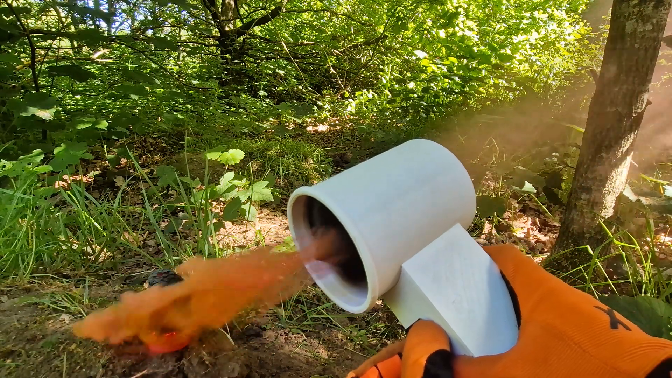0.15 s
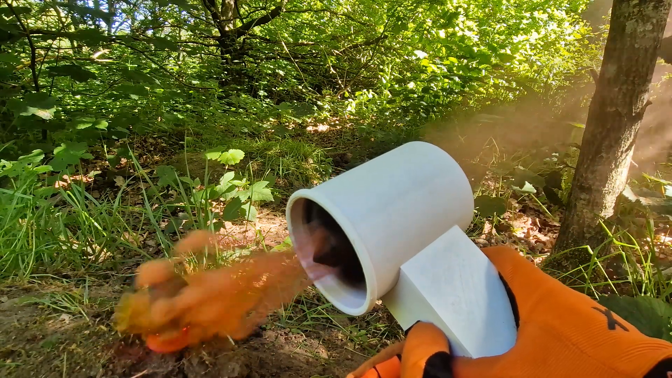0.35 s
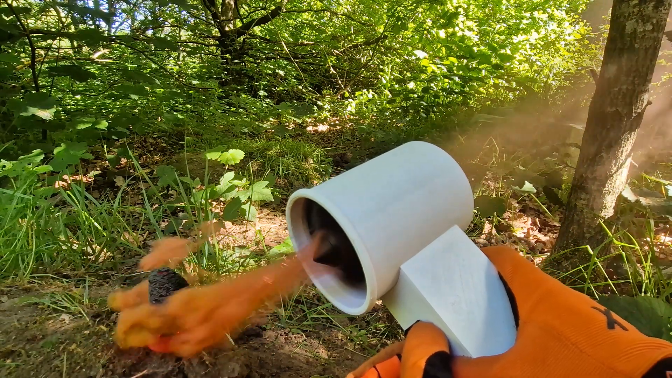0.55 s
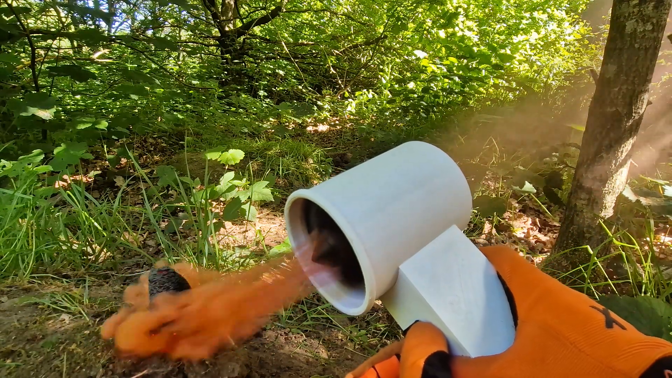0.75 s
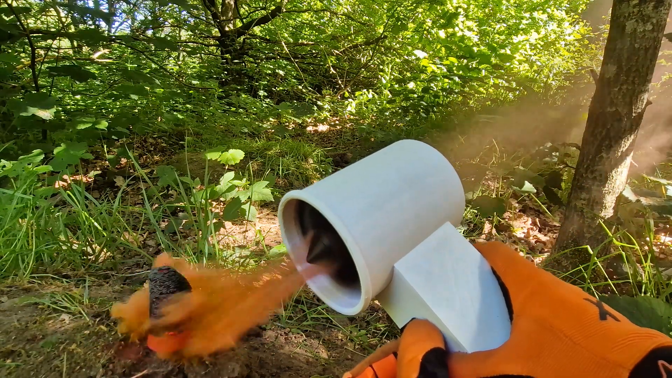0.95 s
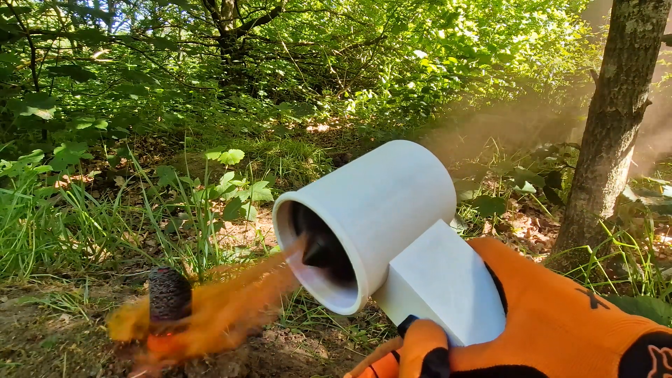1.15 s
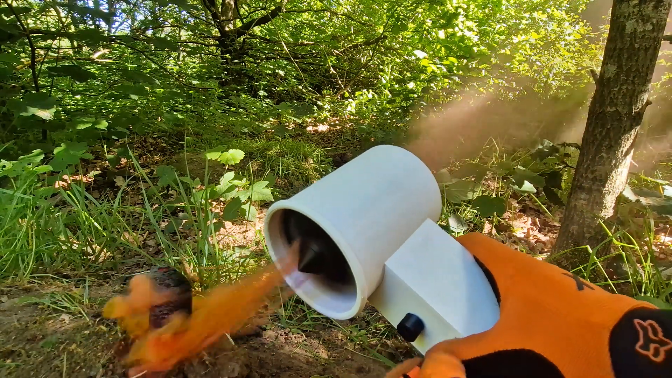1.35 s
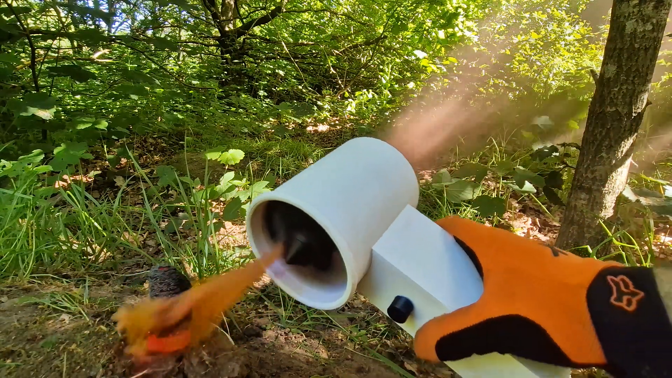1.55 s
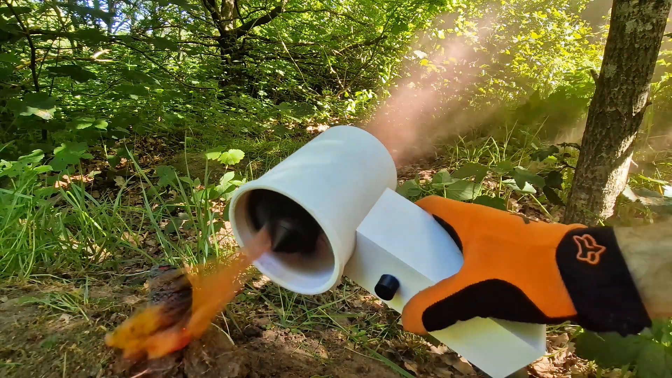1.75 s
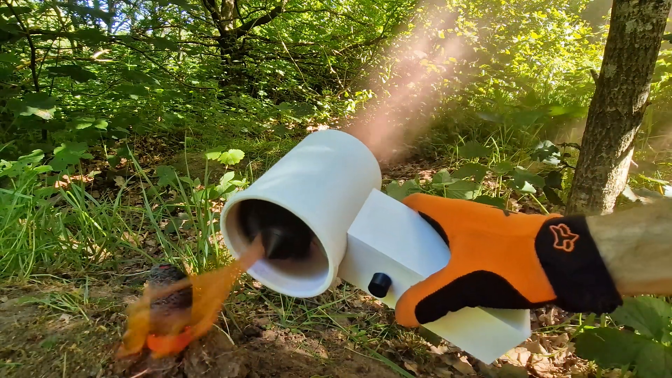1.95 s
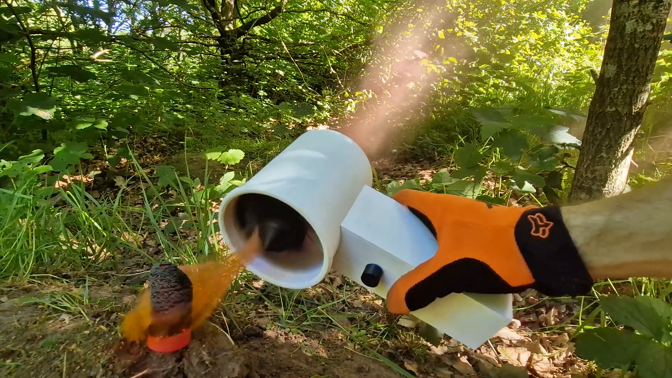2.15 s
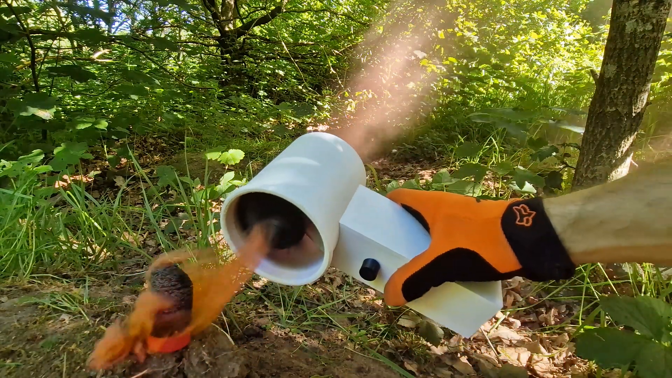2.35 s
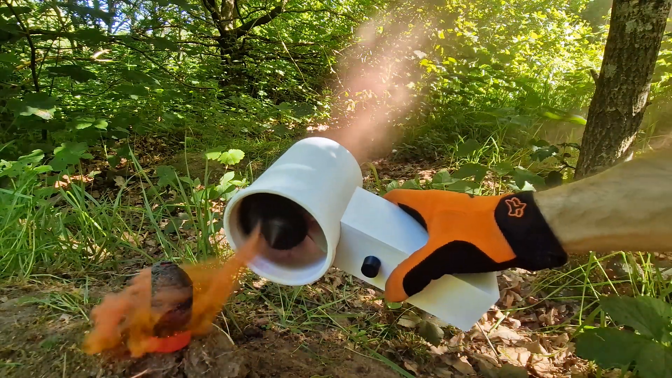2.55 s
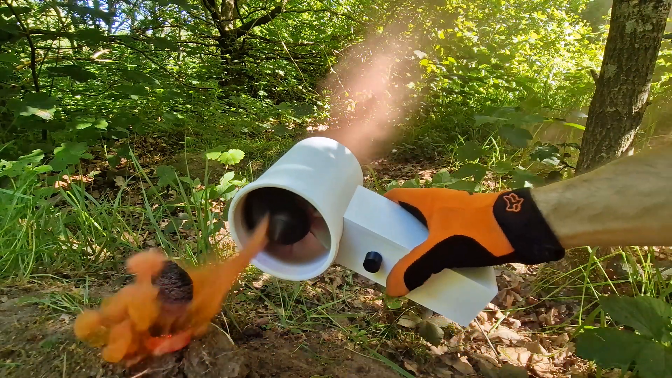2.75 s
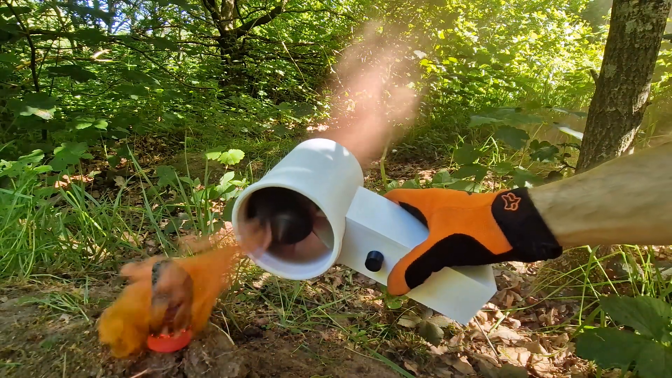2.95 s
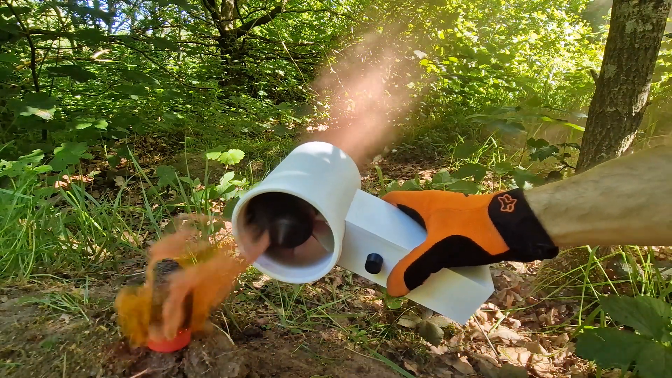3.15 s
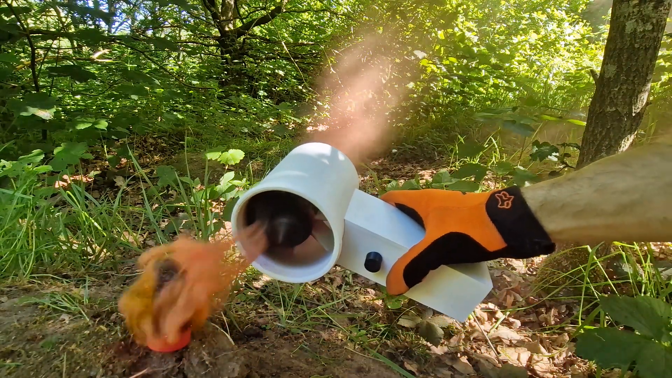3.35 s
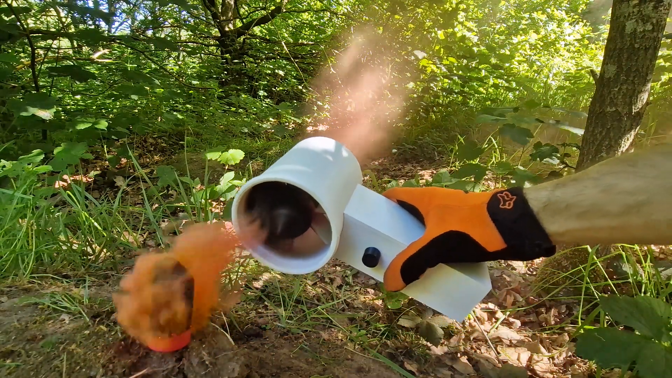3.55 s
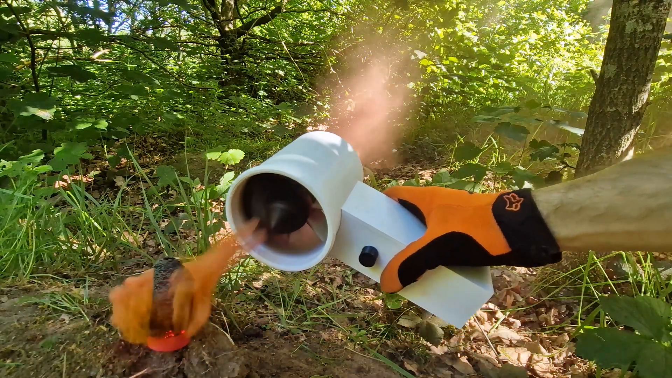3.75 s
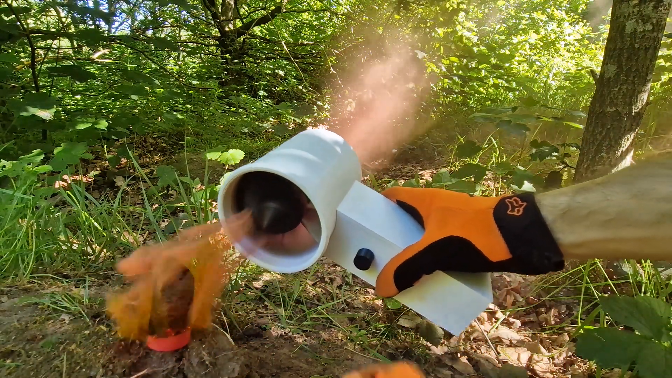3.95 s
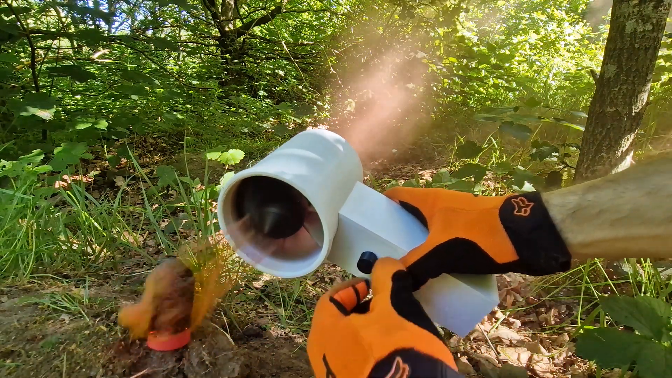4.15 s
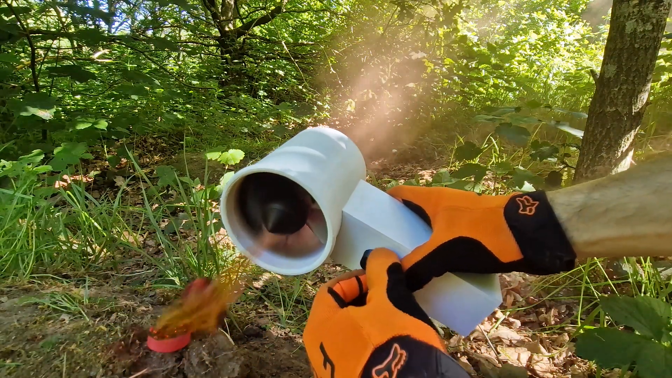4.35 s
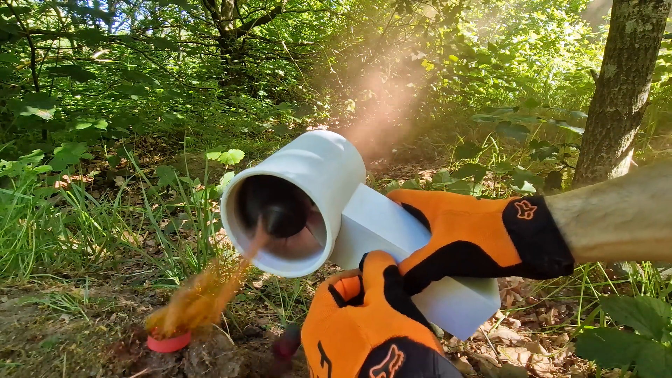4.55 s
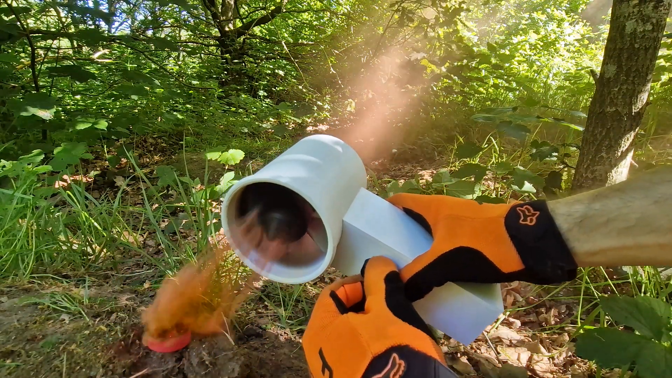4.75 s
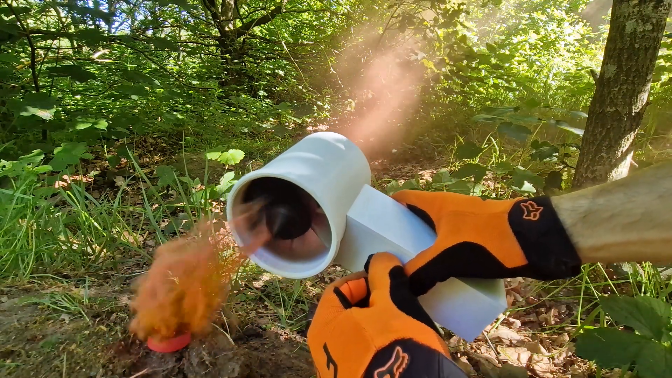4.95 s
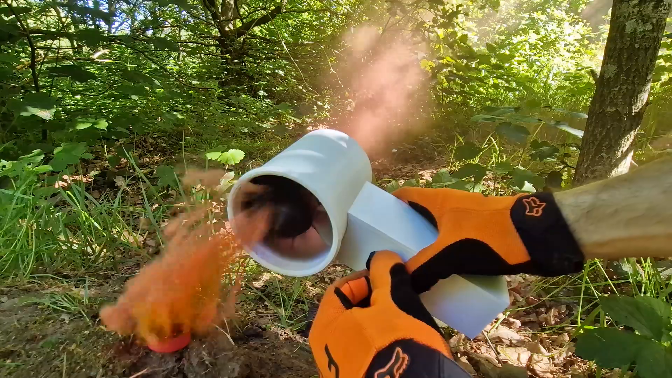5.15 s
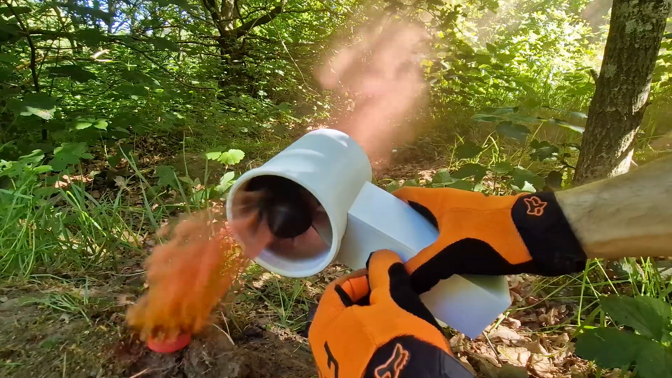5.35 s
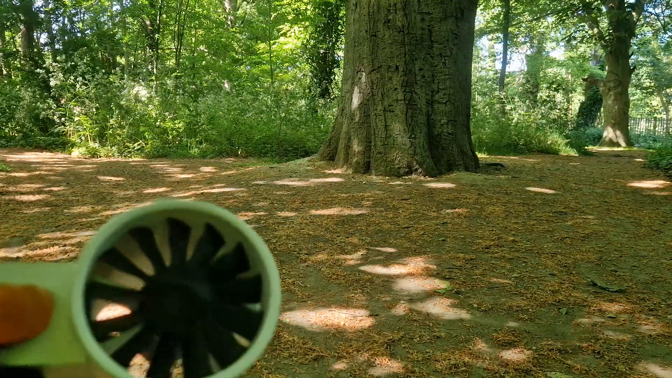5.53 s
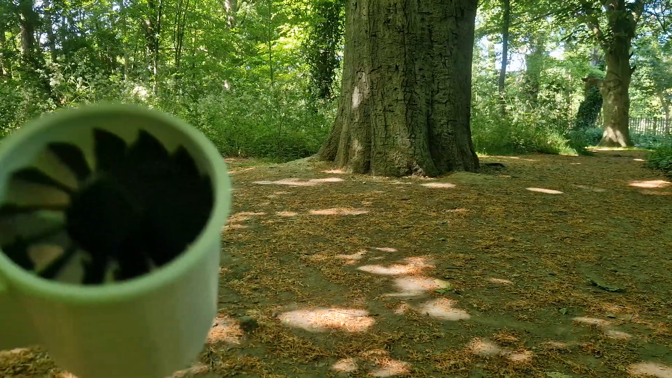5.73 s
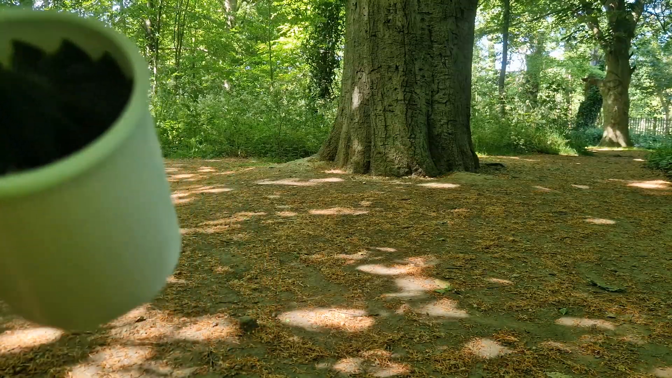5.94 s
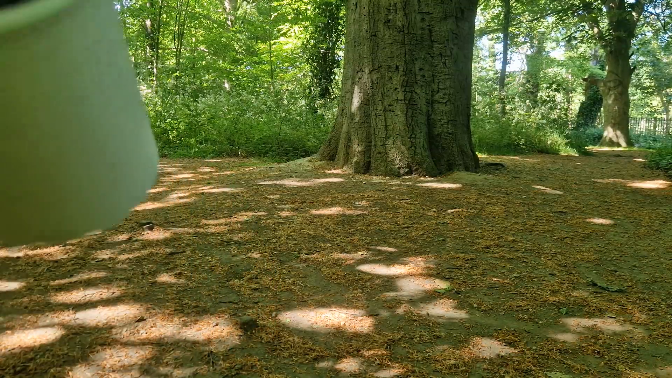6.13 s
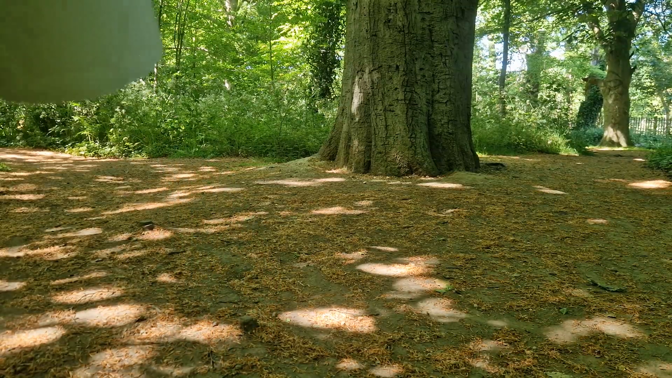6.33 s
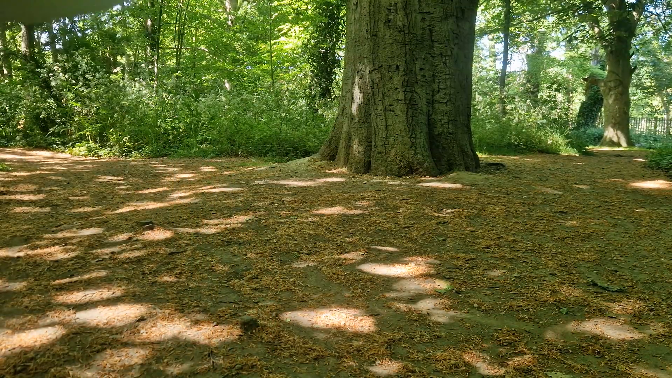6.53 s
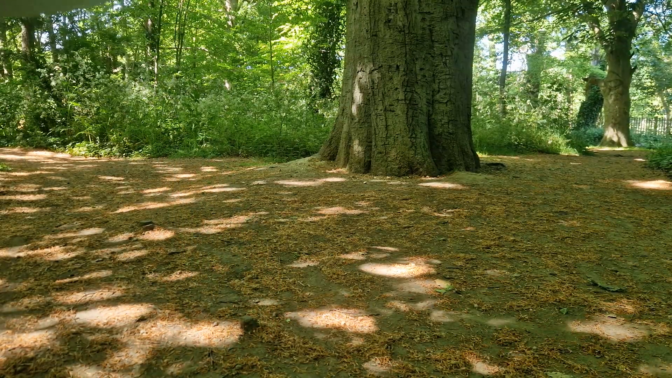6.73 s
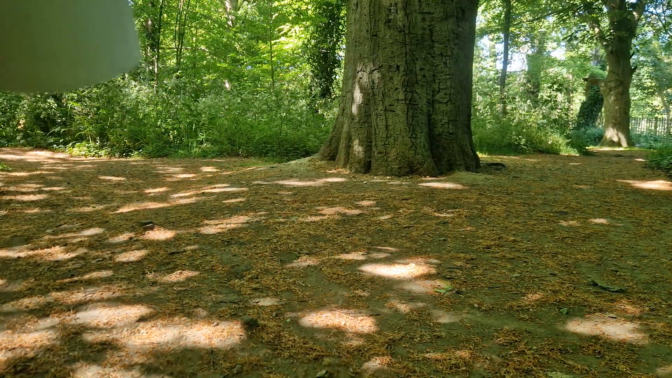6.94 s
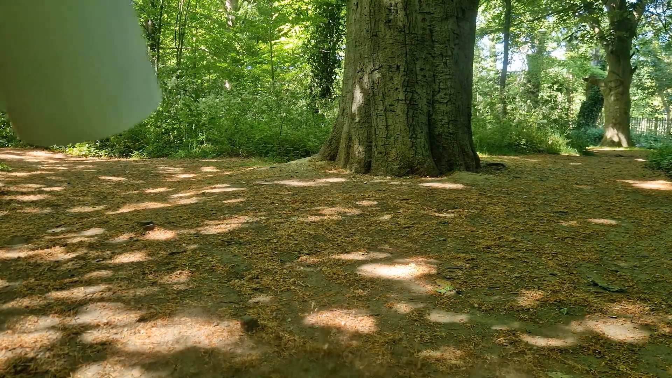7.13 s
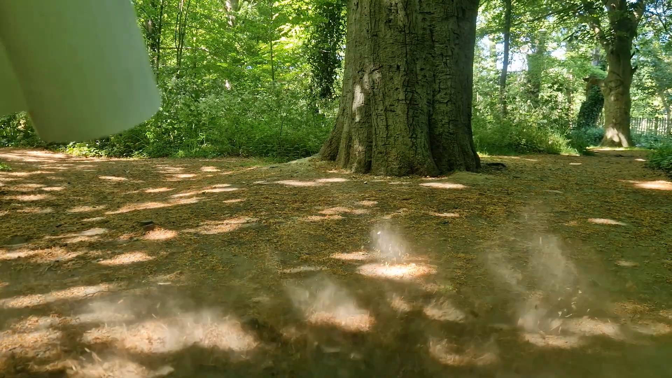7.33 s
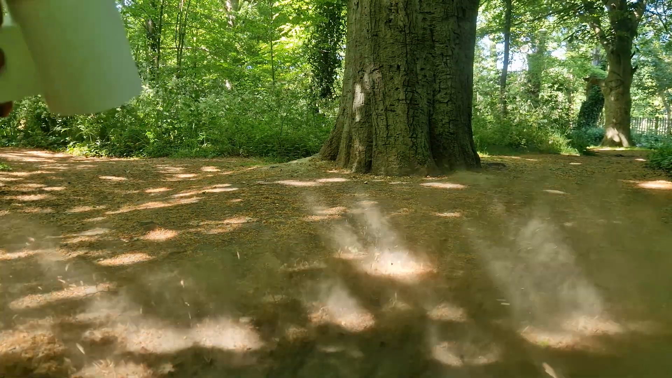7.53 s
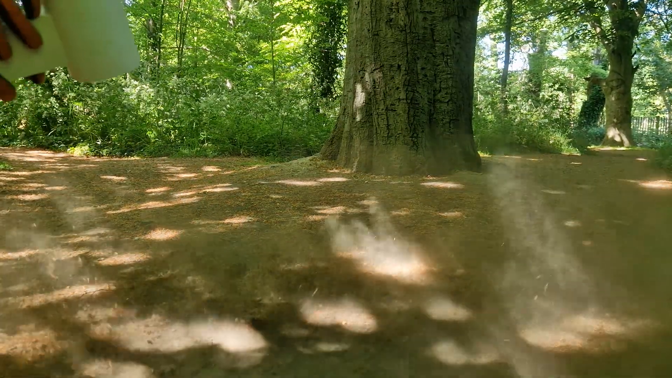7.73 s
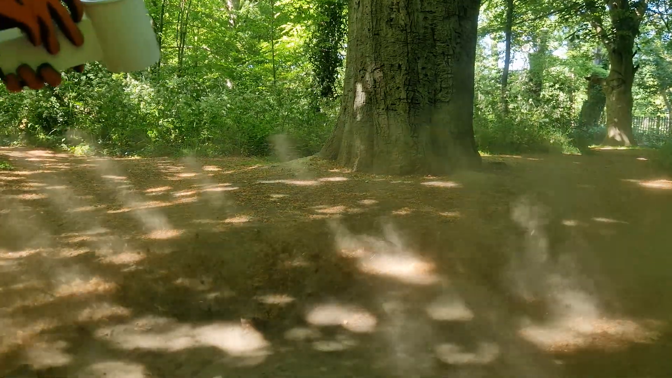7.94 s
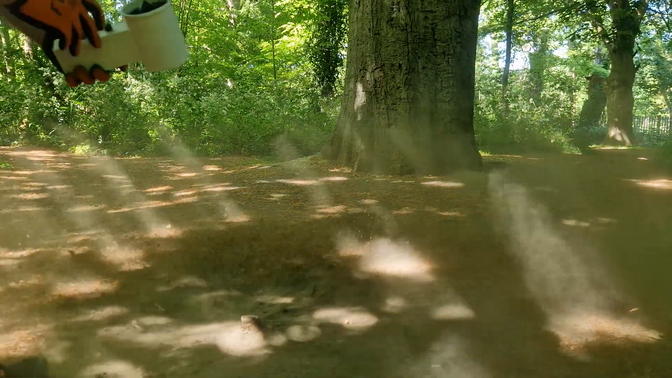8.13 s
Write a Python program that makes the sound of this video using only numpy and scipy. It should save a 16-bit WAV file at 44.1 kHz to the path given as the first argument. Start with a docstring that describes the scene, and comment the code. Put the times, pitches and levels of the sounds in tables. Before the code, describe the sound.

Outdoors in a wood, a small electric ducted fan runs close to a stereo microphone, stronger on the left, with a hollow howl, rushing air and thin blade whine. A soft thump comes as it is turned down. The scene cuts to faint leaves and a far engine drone; then the fan spins up from rest, surging to a loud buzzing, hissing blast.

```python
"""In a wood, a hand-held 13-bladed ducted fan runs close to a stereo microphone, in two scenes.
First it sucks in smoke at part throttle, its duct howling (resonant noise), and a knob turns it down.
Then it revs from rest to full speed: the rotor buzzes (shaft orders) and the jet hisses (shaped noise).
The speed controller whistles faintly (a carrier with sidebands); behind the fan, leaves rustle (soft
noise) and an engine drones far away (one gliding tone)."""
import sys
import numpy as np
from scipy.fft import rfft, irfft, next_fast_len
from scipy.io import wavfile
from scipy.ndimage import uniform_filter1d, map_coordinates

SR = 44100
rng = np.random.default_rng(int(sys.argv[2]) if len(sys.argv) > 2 else 0)


def digitize_waveform(pressure):
    """Quantize a signal to 16-bit integers and store it at the path in sys.argv[1].

    Rows of a 2-D input are taken as channels; values are limited to [-1, 1].
    """
    field = np.atleast_2d(pressure).T
    bounded = np.clip(field, -1, 1)
    quanta = np.round(bounded * 32767).astype(np.int16)
    wavfile.write(sys.argv[1], SR, quanta)


N = 365588

# Rotor speed in each scene. Each row: time in seconds, shaft speed in turns a second.
SMOKE_SPEED = [(0, 121.5), (.25, 122.3), (.4, 130), (.85, 138.4), (1.1, 137), (1.25, 140.4), (2, 142),
               (2.9, 140.1), (3.3, 140.6), (4.2, 142.7), (4.43, 141.2), (4.6, 123), (4.85, 100), (5.47, 96)]
REV_SPEED = [(6.09, 10), (6.15, 34), (6.23, 56), (6.35, 77), (6.5, 98), (6.6, 105.5), (6.75, 111.5),
             (6.85, 121), (6.88, 132), (6.95, 168), (7.03, 240), (7.1, 304), (7.18, 325), (7.28, 333.5),
             (7.6, 328), (7.95, 323), (8.29, 317)]
# The hand swings the intake towards the microphone. Each row: time in seconds, share of the swing (0-1).
SWING = [(1.15, 0), (1.6, .55), (2.9, 1)]
# Air at part throttle; rows are draught, howl, upper duct modes, hiss.
# Each row: base level at cruise in dB, dB per doubling of speed, change with the full swing in dB.
SMOKE_LAWS = [(-40.5, 9, 0), (-24, 25, -4.5), (-36.5, 15.5, -0.2), (-35.5, 19.5, 2)]
# Air while revving, rows in the same order. Each row: base level at the knee in dB, dB per doubling
# below it, dB per doubling above it, surge under hard acceleration in dB, change once lifted in dB.
REV_LAWS = [(-38, 12, 1.5, 7, -4), (-33.5, 27, 1, 6, -3), (-37, 18, 6, 8, -5), (-41.5, 18, 9, 6.5, -4)]
# Duct resonances: the howl locked on, the loose howl of a slow flow, the upper modes.
# Each row: centre in Hz, width in Hz, relative level in dB.
SMOKE_HOWL = [(1043, 95, 0.5), (1114, 295, -8), (935, 140, -17)]
SMOKE_LOOSE = [(743, 120, -9.5), (872, 170, 0), (1095, 350, 7), (1214, 110, 6)]
SMOKE_DUCT = [(1530, 290, -12), (1980, 240, 4.5), (2300, 770, -1.5), (2860, 370, -6.5)]
REV_HOWL = [(1060, 240, 2.5), (1136, 250, -2), (1480, 140, -3)]
REV_DUCT = [(2025, 92, 6.5), (2037, 1360, -1.5), (3000, 190, -4.5)]
# Duct modes heard from the side, before the swing. Each row: centre in Hz, width in Hz, relative dB.
SIDE_MODES = [(390, 90, -9), (870, 200, 0), (3050, 380, -13)]
# Duct modes that the blade tone sweeps through. Each row: centre in Hz, width in Hz, gain in dB.
BLADE_FLARES = [(2060, 180, -28), (4220, 150, -42)]
# Strong and higher shaft orders. Each row: order (cycles per turn), base level at full speed in dB.
BUZZ = [(1, -29.5), (2, -33.5), (3, -33), (4, -35.5)]
OVERTONES = [(5, -40), (6, -54), (7, -42.5), (8, -41), (9, -49), (11, -70), (12, -66)]
# Noise colours of draught, hiss, its fizzing top, and the wood. Each row: frequency in Hz, relative dB.
SMOKE_DRAUGHT = [(20, -24), (45, -4), (80, 4), (130, 2.5), (250, -0.5), (390, 2), (620, 0.5), (730, 3),
                 (1000, -14.5), (1600, -2), (3000, -48)]
REV_DRAUGHT = [(30, -25), (120, -10), (220, -10), (380, -0.5), (520, -1), (700, 3), (880, 1.5), (1500, 2.5),
               (3000, -48)]
SMOKE_HISS = [(900, -31), (2000, -5.5), (2800, -2.5), (3600, 2), (4500, 0.5), (5300, 1), (6400, 1),
              (7100, 1), (7700, 1), (8500, -8), (10000, -23)]
REV_HISS = [(900, -14.5), (2500, -4), (3700, -1.5), (4200, 1.5), (4550, -0.5), (5300, 4), (6400, 4.5),
            (7000, 3.5), (7600, 4), (8500, -6.5), (10000, -50)]
FIZZ = [(6000, -19), (8900, 0.5), (10400, 3), (12500, 0.5), (13700, 0), (15000, 0), (16000, -1.5)]
WOOD = [(15, -47), (25, -17), (38, -6.5), (59, -7.5), (71, -17), (86, -15.5), (116, -22), (209, -35),
        (722, -39), (1800, -47.5), (7500, -50), (9050, -63), (15500, -62)]
# Likeness of noise at the two ports. Each row: frequency in Hz, left-right correlation (0-1).
ALIKE = [(100, .985), (1100, .97), (2200, .72), (4500, .53), (8000, .36), (14000, .24)]
# Port balance for the fan. Each row: frequency in Hz, left over right in dB.
SMOKE_SIDE = [(60, 3.1), (110, 1.8), (200, 5.3), (380, 4.3), (700, 4.6), (1290, 2.1), (2380, 7.9),
              (4400, 4.6), (8120, 6.4), (15000, 9.5)]
REV_SIDE = [(60, 2.0), (110, 3.4), (200, 7.4), (380, 5.3), (700, 5.4), (1290, 5.1), (2380, 5.8),
            (4400, 6.4), (8120, 3.7), (15000, 7.6)]
# Far engine. Each row: time in seconds, pitch in Hz, base level in dB.
DRONE = [(5.2, 67.1, -55), (5.39, 62, -53), (5.51, 54.7, -54), (5.72, 51, -50), (5.91, 53.5, -45),
         (6.13, 66.1, -51), (6.22, 66.3, -61), (6.7, 52.8, -50), (7.02, 49.7, -50), (7.25, 48.3, -57),
         (7.44, 49.4, -65), (8.29, 47.8, -52)]

T = np.arange(N) / SR  # (s)
SIZE = next_fast_len(N + 8192)  # padded length for filtering
HZ = np.fft.rfftfreq(SIZE, 1 / SR)
LEFT_RIGHT = np.array([[1], [-1]])  # a dB tilt: added at the left port, taken from the right

CUT = 5.462  # the second scene begins (s)
TOP_HZ = 15800  # the microphone's band limit
BLADES = 13
CRUISE, FULL = 140, 325  # part and full throttle (turns a second)
KNEE = 111.2  # the flow through the duct is established (turns a second)
HARD_ACCELERATION = 900  # (turns a second, per second)
SURGE_LAG_S = 0.02  # the eddies take a moment to build up
LOCK_SPEED = 164  # revving, the howl locks around this speed (turns a second)
LOCK_DOUBLINGS, LOCK_DB = 0.33, 7.5  # range of that lock in doublings, and its lift
BLADE_LEAN_DB = 2.5  # the blade tone beams at the left port
LIFT_AT, LIFT_S = 7.3, 0.49  # the hand raises the fan away from the microphone (s)
GROUND_MS = 2.983  # lag of the ground's echo before the fan rises
GROUND_MS_PER_S, RISE_AT = 1.29, 7.0  # growth of that lag, from this time (s)
SWITCH_HZ = 8040  # whistle of the speed controller


def part_throttle():
    """Air blows the duct's lowest resonance like a pipe; a thin blade tone rides above it."""
    speed, = curves(SMOKE_SPEED)
    swing, = curves(SWING)
    shaded = ramp(3.85, .35)  # the other hand reaches for the knob and shades the intake
    doublings = np.log2(speed / CRUISE)
    draught_db, howl_db, duct_db, hiss_db = (
        db + slope * doublings + swung * swing for db, slope, swung in SMOKE_LAWS)
    angle = shaft_angle(speed, jitter=.002)

    # only a fast flow locks onto one resonance; a slow one stirs several loosely
    locked = np.clip((speed - 110) / 32, .02, .98)
    howl = np.sqrt(locked) * turbulence(resonances(SMOKE_HOWL), flutter_db=.5)
    howl += np.sqrt(1 - locked) * turbulence(resonances(SMOKE_LOOSE), flutter_db=.2)
    air = amp(howl_db) * howl
    air += amp(draught_db) * turbulence(amp(along(SMOKE_DRAUGHT)), flutter_db=0.9)
    duct_db = duct_db - 0.99 * shaded + beam_gap(at=1.77, width_s=0.99, depth_db=-4.5)
    air += amp(duct_db) * turbulence(resonances(SMOKE_DUCT), flutter_db=0.35)
    air += amp(hiss_db) * jet(SMOKE_HISS, speed, fizz_db=-8, brighten_db=3, mode_hz=1045, echo=0.055)
    side_db = -34.5 - 10 * doublings - 24 * swing
    air += amp(side_db) * turbulence(resonances(SIDE_MODES), flutter_db=1)

    blade_db = -46 + 32 * doublings - 5 * shaded + beam_gap(at=1.6, width_s=.45, depth_db=-8)
    blades = amp(blade_db) * blade_tone(angle)
    unbalance = amp(-51.5 + 9 * doublings) * tone(angle, waver_db=1.8)
    whistle = controller(angle, speed, db=-62, sideband_db=-8)
    fan = air + blades + unbalance + whistle + cogging(angle, speed, db=-52)
    drift_db = 0.03 * (T - 2.7) * LEFT_RIGHT  # the hand carries the fan slowly to the left
    return amp(drift_db) * ports(fan, lead_ms=0.15, side=SMOKE_SIDE)


def rev_up():
    """The air surges as the rotor accelerates from rest; at full speed its unbalance shakes the shell."""
    speed, = curves(REV_SPEED)
    doublings = np.log2(speed / KNEE)
    surge = strain(speed)
    lifted = ramp(LIFT_AT, LIFT_S)
    draught_db, howl_db, duct_db, hiss_db = (
        db + np.where(doublings < 0, below, above) * doublings + surge_db * surge + lift_db * lifted
        for db, below, above, surge_db, lift_db in REV_LAWS)
    angle = shaft_angle(speed, jitter=.002)

    air = amp(draught_db) * turbulence(amp(along(REV_DRAUGHT)), flutter_db=1.3)
    lock_db = LOCK_DB * np.exp(-(np.log2(speed / LOCK_SPEED) / LOCK_DOUBLINGS) ** 2)
    air += amp(howl_db + lock_db) * turbulence(resonances(REV_HOWL), flutter_db=0.3)
    air += amp(duct_db) * turbulence(resonances(REV_DUCT), flutter_db=1.2)
    fizz_db = -11 + 1.5 * lifted
    air += amp(hiss_db) * jet(REV_HISS, speed, fizz_db, brighten_db=4.5, mode_hz=1060, echo=0.053)

    tones = rotor_buzz(angle, speed, db_per_doubling=34)
    tones = tones + whine(angle, speed, db_per_doubling=8, surge_db=14, mode_hz=1050, echo=0.71)
    unbalance = amp(-58.5) * ramp(6.3, 0.13) * tone(angle, waver_db=2)
    tones = amp(-2.0 * lifted) * tones + unbalance

    # the controller sputters briefly until the rotor falls into step, then the magnets take hold
    sputter_gate = ramp(6.18, .02) * (1 - ramp(6.23, .04))
    sputter = amp(-64) * sputter_gate * turbulence(amp(along(FIZZ)), flutter_db=2)
    catch = ramp(6.27, .08) * cogging(shaft_angle(speed, jitter=.05), speed, db=-43)
    catch += bump(at=6.297, hz=750, decay=.025, db=-36)
    whistle = controller(angle, speed, db=-63.5, sideband_db=-3)

    fan = ground(air, strength=0.14, dull_hz=1000) + ground(tones, strength=0.58, dull_hz=1480)
    kick_db = -1.6 * np.exp(-((T - 7.1) / 0.16) ** 2)  # thrust kicks the fan briefly to the right port
    fan = fan * amp(kick_db * LEFT_RIGHT)
    running = ramp(6.08, 0.035) * (fan + whistle)
    return ports(running + sputter + catch, lead_ms=0.2435, side=REV_SIDE)


def jet(spectrum, speed, fizz_db, brighten_db, mode_hz, echo):
    """Hiss of the air jet; its top grows by brighten_db for each doubling of speed above 100 turns/s."""
    top = amp(fizz_db + brighten_db * np.log2(np.maximum(speed, 100) / CRUISE))
    hiss = turbulence(amp(along(spectrum)) * pipe(HZ, mode_hz, echo), flutter_db=0.48)
    fizz = top * turbulence(amp(along(FIZZ)), flutter_db=0.73)
    return bounces(hiss + fizz, strength=.115, sway_ms=.07)


def rotor_buzz(angle, speed, db_per_doubling):
    """Pushes once a turn, strong near full speed: four shaft orders, all peaking together."""
    pushes = sum(amp(db) * tone(order * angle + np.pi / 2, waver_db=.5 * np.sqrt(order))
                 for order, db in BUZZ)
    return amp(db_per_doubling * np.log2(speed / FULL)) * pushes


def whine(angle, speed, db_per_doubling, surge_db, mode_hz, echo):
    """Higher shaft orders and the blade tone; each flares as it sweeps through a mode of the duct."""
    orders = sum(amp(db) * pipe(order * speed, mode_hz, echo) * tone(order * angle + np.pi / 2, waver_db=2)
                 for order, db in OVERTONES)
    orders_db = db_per_doubling * np.log2(speed / FULL) + surge_db * strain(speed)
    blade_hz = BLADES * speed
    flare = np.sqrt(sum(amp(db) ** 2 / (1 + (2 * (blade_hz - hz) / width) ** 2)
                        for hz, width, db in BLADE_FLARES))
    # the tone grows as the flow sets in and weakens again at high speed
    loading = np.minimum(speed / KNEE, 1) ** 4 * np.minimum(155 / speed, 1) ** 1.1
    blades = loading * flare * blade_tone(angle)
    return ramp(6.4, 0.14) * amp(orders_db) * orders + blades


def blade_tone(angle):
    """The whine of the passing blades, a narrow beam that favours the left port."""
    return amp(BLADE_LEAN_DB * LEFT_RIGHT) * tone(BLADES * angle, waver_db=2)


def beam_gap(at, width_s, depth_db):
    """Blade tone and upper duct modes beam in lobes; a gap between two passes the microphone (dB)."""
    return depth_db * np.exp(-((T - at) / width_s) ** 2)


def strain(speed):
    """0-1: how hard the motor drives the blades against air that has not yet caught up."""
    acceleration = uniform_filter1d(np.gradient(speed) * SR, size=SR // 20)
    push = np.clip(acceleration / HARD_ACCELERATION, 0, 1) * np.minimum(speed / CRUISE, 1) ** 2
    return np.interp(T - SURGE_LAG_S, T, push)


def shaft_angle(speed, jitter):
    """The rotor's angle in radians; eddies make its speed waver."""
    return 2 * np.pi * np.cumsum(speed * (1 + jitter * wobble(30))) / SR


def cogging(angle, speed, db):
    """The motor's magnets tug eight times a turn, heard while that rate meets a resonance of the shell."""
    shell = 1 / (1 + ((8 * speed - 690) / 110) ** 2)
    return amp(db) * shell * tone(8 * angle, waver_db=4)


def controller(angle, speed, db, sideband_db):
    """The switching whistle fades as speed rises; its sidebands spread as the magnets pass faster."""
    carrier = np.sqrt(2) * np.sin(2 * np.pi * SWITCH_HZ * T)
    magnets = np.cos(4 * angle)
    fade_db = -.23 * np.maximum(speed - 100, 0)
    return amp(db + fade_db) * carrier * (1 + amp(sideband_db) * magnets)


def bump(at, hz, decay, db):
    """A soft push on the fan's body: one quickly damped mode."""
    age = np.maximum(T - at, 0)
    return amp(db) * ramp(at, 0.0041) * np.exp(-age / decay) * np.sin(2 * np.pi * hz * age)


def turbulence(gain, flutter_db):
    """Fluttering stereo noise of rms 1, less alike left and right towards the treble."""
    turn = np.arccos(np.clip(along(ALIKE), 0, 1)) / 2
    mid_side_gain = gain * np.array([np.cos(turn), np.sin(turn)])
    mid, side = filtered(rng.standard_normal((2, N)), mid_side_gain)
    flutter = unit(wobble(9) + wobble(45))
    return unit(np.array([mid + side, mid - side]) * amp(flutter_db * flutter))


def tone(angle, waver_db):
    """A line of rms about 1 whose strength wavers at random."""
    return np.sqrt(2) * np.sin(angle) * amp(waver_db * wobble(18))


def resonances(modes):
    """Gain of a few steep-sided resonances, their powers added."""
    return np.sqrt(sum((amp(db) / (1 + (2 * (HZ - hz) / width) ** 2)) ** 2 for hz, width, db in modes))


def pipe(hz, mode_hz, echo):
    """Sound runs to and fro between the duct's open ends, lifting every multiple of its lowest mode."""
    return np.sqrt(1 - echo ** 2) / np.abs(1 - echo * np.exp(2j * np.pi * hz / mode_hz))


def bounces(x, strength, sway_ms):
    """Ground, hand and shell return weak copies; their paths sway, so faint bands drift in the hiss."""
    paths_ms = (1.3, 2.1, 2.9, 4.4)
    delays = [(ms + sway_ms * wobble(1.2)) / 1000 for ms in paths_ms]
    copies = np.array([sum(np.interp(T - d, T, channel) for d in delays) for channel in x])
    return unit(x + strength * copies)


def ground(x, strength, dull_hz):
    """The ground returns a duller copy, later as the fan rises, so notches slide down through the sound."""
    lag = (GROUND_MS + GROUND_MS_PER_S * np.maximum(T - RISE_AT, 0)) / 1000
    dull = filtered(np.atleast_2d(x), 1 / (1 + (HZ / dull_hz) ** 2))
    return x + strength * np.array([np.interp(T - lag, T, channel) for channel in dull])


def ports(x, lead_ms, side):
    """The fan is nearer the left microphone port: earlier and louder there."""
    half = amp(along(side) / 2) * np.exp(1j * np.pi * HZ * lead_ms / 1000)
    return filtered(x, np.array([half, 1 / half]))


def woodland():
    """Faint leaves as soft noise, and the drone of a far engine as one gliding tone."""
    drone_hz, drone_db = curves(DRONE)
    drone_angle = 2 * np.pi * np.cumsum(drone_hz) / SR
    drone = ramp(5.1, 0.18) * amp(drone_db) * tone(drone_angle, waver_db=1)
    above_drone = HZ ** 2 / (HZ ** 2 + 90 ** 2)
    leaves = amp(-54.5) * turbulence(amp(along(WOOD)) * above_drone, flutter_db=0.5)
    return drone + leaves


def amp(db):
    """Decibels to gain."""
    return 10 ** (np.asarray(db) / 20)


def unit(x):
    """Scale to rms 1."""
    return x / np.sqrt(np.mean(x ** 2) + 1e-20)


def along(points):
    """(Hz, value) points read on a log frequency axis."""
    f, v = np.transpose(points)
    return np.interp(np.log(HZ + 1), np.log(f + 1), v)


def curves(rows):
    """One value per sample for each column after the time."""
    s, *cols = np.transpose(rows)
    return [np.interp(T, s, c) for c in cols]


def ramp(start, length):
    """Rises from 0 to 1 (start and length in seconds)."""
    return np.clip((T - start) / length, 0, 1)


def wobble(rate):
    """A smooth random curve, rate knots a second."""
    return map_coordinates(rng.standard_normal(4096), [T * rate], mode="wrap")


def filtered(x, response):
    """x through a frequency response."""
    return irfft(rfft(x, SIZE) * response, SIZE)[..., :N]


def scene():
    """The two scenes in turn, the wood behind both; in the first a gloved hand meets the handle."""
    second = ramp(CUT, 0.0022)
    glove = bump(at=4.408, hz=90, decay=.013, db=-25)
    fan = (1 - second) * (part_throttle() + glove) + second * rev_up()
    return fan + woodland() * amp(LEFT_RIGHT)  # the wood leans left, 1 dB up there and 1 dB down right


def record(dry):
    """The microphone keeps nothing above its band limit."""
    return filtered(dry, HZ < TOP_HZ)


dry = scene()
out = record(dry)
digitize_waveform(out)
```